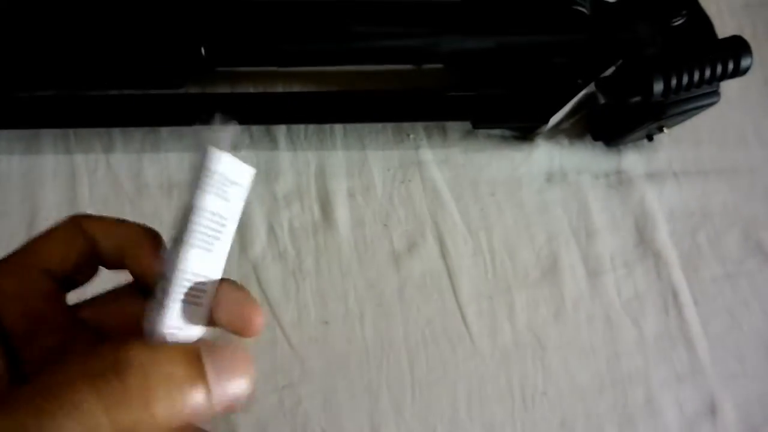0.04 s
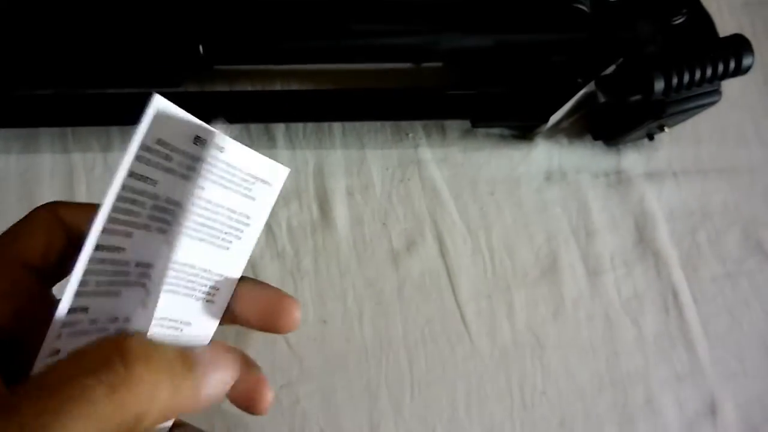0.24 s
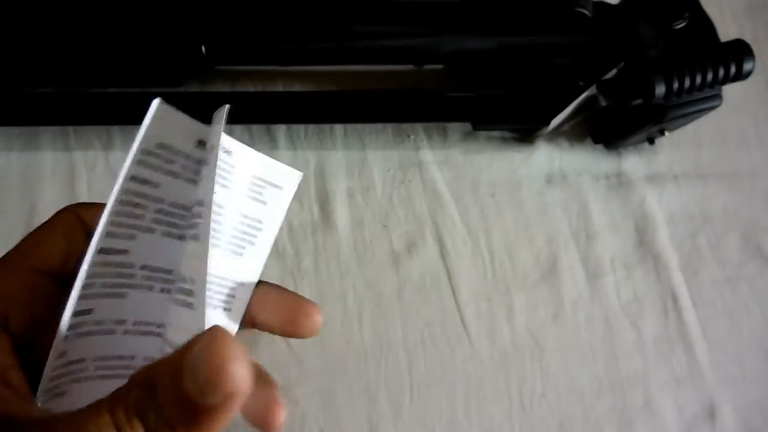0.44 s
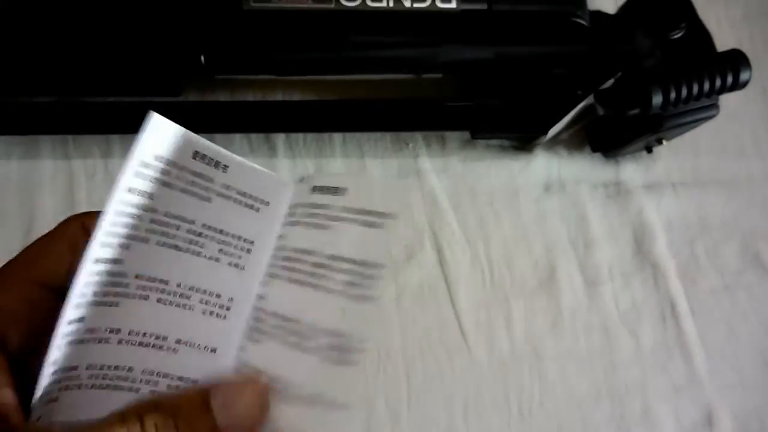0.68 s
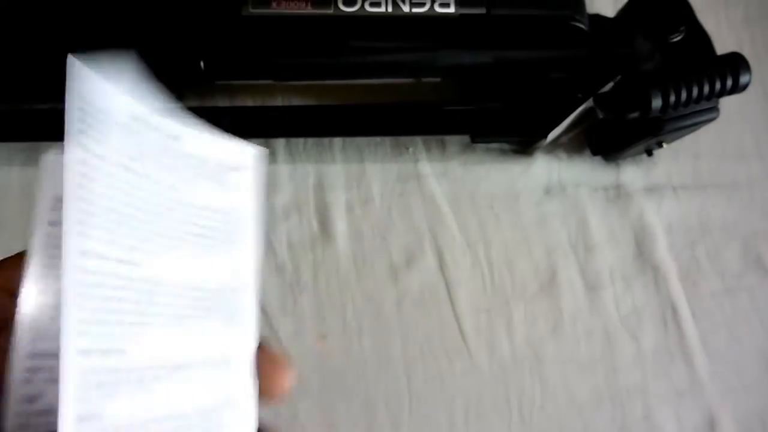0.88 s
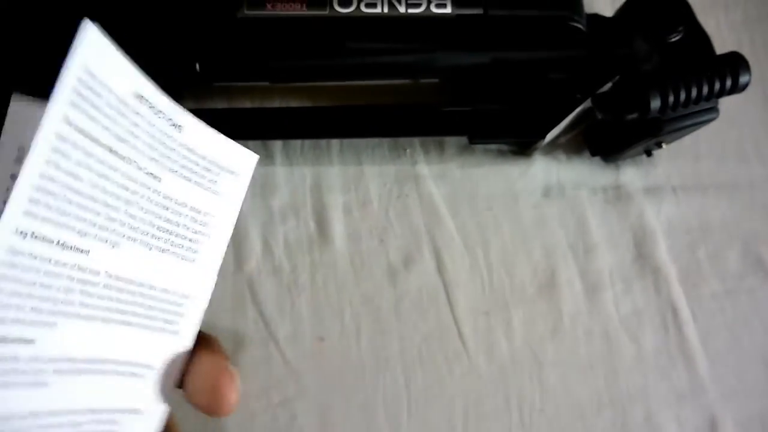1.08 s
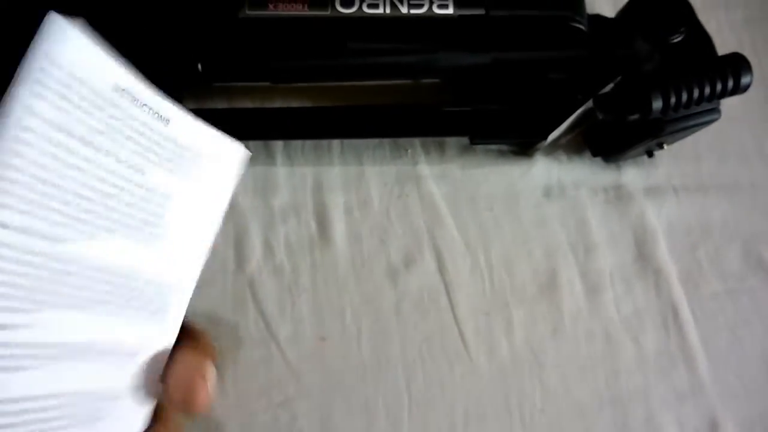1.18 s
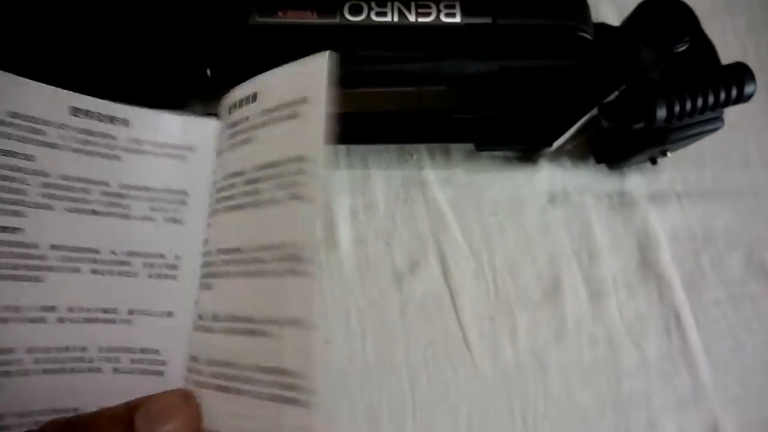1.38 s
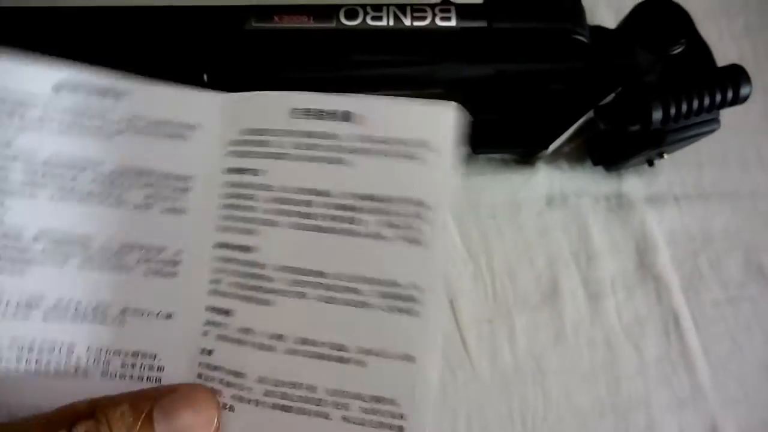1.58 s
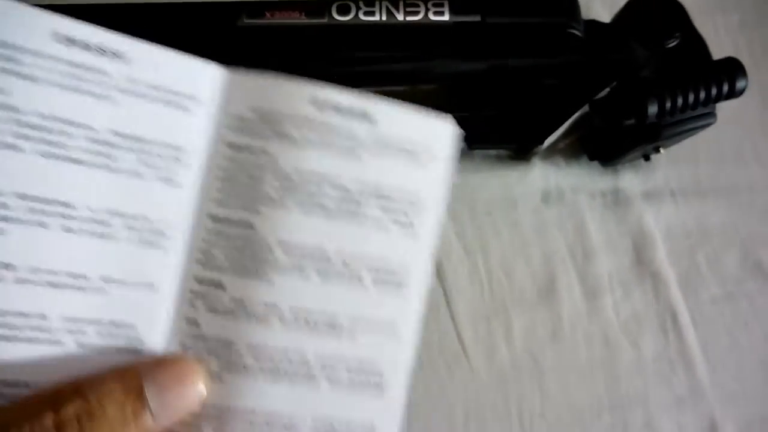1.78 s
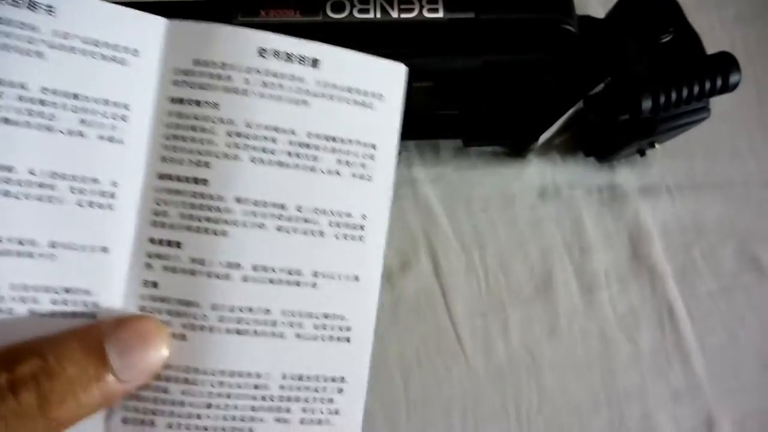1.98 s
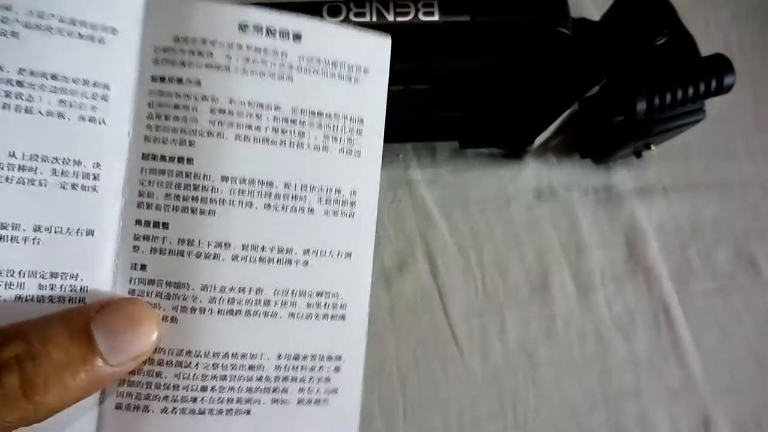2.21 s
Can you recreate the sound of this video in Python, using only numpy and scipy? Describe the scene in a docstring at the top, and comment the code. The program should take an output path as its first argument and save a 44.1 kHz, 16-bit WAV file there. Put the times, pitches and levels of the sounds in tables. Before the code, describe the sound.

A paper leaflet is unfolded by hand close to the microphone. A soft slide and small ticks lead to irregular crackling flaps and pops, with pages rubbing in between, in a quiet room with faint hiss.

```python
"""A folded paper leaflet is opened by hand, close to a small stereo microphone in a quiet room.
First a page slides softly and creases tick; at 0.25 s a panel buckles and flips with a crackling flap.
More flaps follow, with pops as panels pull tight and soft thuds as the sheet bends, loudest near
1.3 and 1.6 s. In between, pages rub over each other and the fingers. A last small flap comes near 1.9 s.
All along, the room adds a short echo and a faint hiss."""
import sys
import numpy as np
from scipy import signal
from scipy.fft import rfft, irfft
from scipy.io import wavfile
from scipy.ndimage import uniform_filter1d

SR = 44100
rng = np.random.default_rng(int(sys.argv[2]) if len(sys.argv) > 2 else 0)


def materialize(psi):
    """Save the field psi as 16-bit PCM at rate SR to the path in sys.argv[1].

    A 1-D psi becomes a single channel; in a 2-D psi each row is a channel.
    """
    bounded = np.clip(np.atleast_2d(psi).T, -1, 1)
    quanta = np.round(bounded * 32767).astype(np.int16)
    wavfile.write(sys.argv[1], SR, quanta)


N = 99225
T = np.arange(N) / SR
FFT_SIZE = 2 ** 17
FREQS = np.maximum(np.arange(FFT_SIZE // 2 + 1) * SR / FFT_SIZE, 1)


def flaps(count=8192):
    """A panel buckles: a rush of tiny fibre slips swells up to the flip and dies away."""
    # One flip a row: peak_s, level_db, rise_s, decay_s, resonance_hz, resonance_db, bass_db, treble_db
    flips = [(0.2439, -31, 0.0025, 0.00055, 2100, 8, 5, 15),
             (0.2551, -24.5, 0.0032, 0.0014, 3140, 3, 7, -2),
             (0.557, -35.5, 0.0084, 0.0053, 1610, 7.5, 2, 5),
             (0.6184, -27, 0.00061, 0.003, 1730, 16.5, 23, 3.5),
             (0.643, -38, 0.0062, 0.0037, 1790, 15, -1, 2), (0.9246, -27, 0.0032, 0.0014, 2770, 3, 11, 0),
             (.947, -39.5, 0.0035, 0.0015, 1580, 13, 14, -16), (1.122, -38, 0.004, 0.01, 1570, 4, 3, -1.5),
             (1.182, -40, 0.023, 0.016, 1550, 15, 12, 5), (1.3048, -28, 0.0055, 0.0064, 900, 5, 1, -3.5),
             (1.3074, -21, 0.0037, 0.0031, 1880, 15, 8, -3),
             (1.4123, -30, 0.0004, 0.0025, 2620, 4, -9, -10),
             (1.4192, -27.5, 0.001, 0.0032, 2820, 15, -11, -7),
             (1.5895, -22, 0.005, 0.0034, 3540, 3.5, 0.5, -1),
             (1.941, -34.5, 0.0054, 0.0072, 870, 15.5, -5, 3.5)]
    out = np.zeros((2, N))
    t = (np.arange(count) - count // 2) / SR  # zero at the flip
    for peak_s, level_db, rise_s, decay_s, hz, resonance_db, bass_db, treble_db in flips:
        swell = np.exp(np.minimum(t / rise_s, -t / decay_s))
        slips = swell * fibre_slips(count, per_s=11000, spread_db=3.5)
        sound = signal.fftconvolve(slips, paper_tone(hz, resonance_db, bass_db, treble_db))
        add_in_stereo(out, peak_s + t[0], unit_energy(sound) * np.sqrt(np.sum(swell ** 2)) * undb(level_db))
    return out


def pops(count=2048):
    """A panel is pulled tight: it rings briefly, and its pitch follows the tension, mostly upward."""
    # One pull a row: start_s, peak_db, slack_hz, tight_hz, swell_s
    pulls = [(0.6186, -25, 1450, 1930, 0.00044), (.924, -35.5, 1836, 1770, 0.0038),
             (1.2756, -20.5, 1580, 1840, 0.0003), (1.302, -23, 609, 2210, 0.0027),
             (1.5919, -20.5, 1430, 1810, .0012)]
    out, t = np.zeros((2, N)), T[:count]
    for start_s, peak_db, slack_hz, tight_hz, swell_s in pulls:
        pitch_hz = slack_hz + (tight_hz - slack_hz) * np.minimum(t / (np.pi * swell_s), 1)
        swell = t / swell_s * np.exp(1 - t / swell_s)
        add_in_stereo(out, start_s, undb(peak_db) * swell * np.sin(2 * np.pi * np.cumsum(pitch_hz) / SR))
    return out


def creases(count=1024):
    """A crease gives way: one sharp click, then a brief shiver of the sheet."""
    # One snap a row: start_s, level_db, resonance_hz, treble_db
    snaps = [(0.1261, -39, 2520, 7), (.1445, -41.5, 2780, 9), (0.2506, -24, 2630, -2),
             (0.2553, -23, 6100, 12), (.351, -31, 3670, 5), (0.3984, -38, 3600, 6.5),
             (0.6513, -31, 1760, 4), (.8897, -35.5, 2930, -5), (0.9088, -38, 1310, -12),
             (0.9175, -33, 1880, -1), (1.0225, -34, 2650, -6), (1.0778, -35.5, 1880, -1),
             (1.158, -35, 1600, -8), (1.195, -35, 1600, -3), (1.2742, -36, 2420, 13),
             (1.637, -34, 1470, -5), (1.6973, -34.5, 2060, -18), (1.7624, -41.5, 1840, 5),
             (1.769, -37.5, 2140, -6), (1.7811, -36.5, 1540, -10), (1.84, -36.5, 2550, 4.5),
             (1.9372, -33, 1500, -8)]
    shiver_s, shiver_db = 0.0015, 3.5
    out = np.zeros((2, N))
    for start_s, level_db, hz, treble_db in snaps:
        push = unit_energy(rng.standard_normal(count) * np.exp(-T[:count] / shiver_s)) * undb(shiver_db)
        push[0] -= 1  # the click
        tone = paper_tone(hz, resonance_db=6.5, bass_db=10.5, treble_db=treble_db)
        gain = np.sqrt(0.0013 * SR) * undb(level_db)  # as much energy as 1.3 ms at this level
        add_in_stereo(out, start_s, unit_energy(signal.fftconvolve(push, tone)) * gain)
    return out


def thuds():
    """The whole sheet swings briefly when the fingers push it, with a soft, hollow thud."""
    # One push a row: start_s, level_db, pitch_hz, decay_s
    pushes = [(0.252, -28, 232, 0.0032), (.2535, -29.5, 640, 0.0072), (0.351, -37, 256, 0.0062),
              (0.35, -31, 590, 0.0028), (0.564, -54, 75, 0.012), (.6195, -27.5, 795, .003),
              (0.921, -53.5, 90.5, 0.012), (1.079, -40.5, 177, 0.0048), (1.169, -58.5, 83.5, 0.031),
              (1.305, -41, 81, 0.0047), (1.303, -30.5, 530, 0.0054)]
    out = np.zeros(N)
    for start_s, level_db, pitch_hz, decay_s in pushes:
        t = np.maximum(T - start_s, 0)
        swell = np.exp(-t / decay_s) * (1 - np.exp(-2 * pitch_hz * t))
        out += undb(level_db) * swell * np.sin(2 * np.pi * pitch_hz * t)
    return out


def slides(count=16384, piece=1024):
    """A page rubs in small jerks: dense slips fade in and out, from a spot that keeps moving."""
    # One stroke a row: start_s, end_s, start_db, end_db, resonance_hz, treble_db
    strokes = [(0, 0.083, -56, -51.5, 4900, 8.5), (0.32, 0.44, -56.5, -57, 3650, 3.5),
               (0.464, 0.62, -58.5, -52.5, 2010, 2), (0.648, 0.737, -53, -47, 1680, 4.5),
               (0.763, 0.936, -47, -42.5, 1600, 2.5), (0.928, 0.972, -48, -43, 3630, 1),
               (0.998, 1.205, -48, -50.5, 2550, 2.5), (1.182, 1.32, -57, -47, 1680, 3.5),
               (1.331, 1.394, -49, -55.5, 1640, -2), (1.41, 1.587, -49, -45.5, 2870, -1),
               (1.591, 1.711, -52.5, -46, 1830, -2), (1.647, 1.707, -54, -49.5, 11600, 39),
               (1.764, 1.92, -53.5, -52.5, 1450, -1.5)]
    fade_s, jerk_db = 0.016, 1.9
    out = np.zeros((2, N))
    for start_s, end_s, start_db, end_db, hz, treble_db in strokes:
        t = max((start_s + end_s - count / SR) / 2, 0) + T[:count]
        fade_in = .5 * (1 + np.tanh((t - start_s) / fade_s))
        fade_out = .5 * (1 + np.tanh((end_s - t) / fade_s))
        jerks = unit_rms(uniform_filter1d(rng.standard_normal(count), size=300))
        level_db = np.interp(t, [start_s, end_s], [start_db, end_db]) + jerk_db * jerks
        slips = fibre_slips(count, per_s=6000, spread_db=2.5)
        tone = paper_tone(hz, resonance_db=3.5, bass_db=0, treble_db=treble_db)
        rub = unit_rms(signal.fftconvolve(slips, tone)[:count]) * fade_in * fade_out * undb(level_db)
        for i in range(0, count - piece, piece // 2):  # each new spot scatters in its own way
            add_in_stereo(out, (int(t[0] * SR) + i + .5) / SR, rub[i:i + piece] * np.hanning(piece))
    return out


def fibre_slips(count, per_s, spread_db):
    """Paper fibres slip at random moments, a few much harder than the rest."""
    slipping = rng.random(count) < per_s / SR
    strength = np.minimum(rng.exponential(size=count), 2 * np.e)
    return rng.choice([-1, 1], count) * slipping * undb(spread_db * strength)


def paper_tone(hz, resonance_db, bass_db, treble_db, size=2048):
    """How a panel answers one tap: the paper's own tone, a broad resonance at hz, bass and treble."""
    # How strongly the paper sounds, from low to high: frequency_hz, level_db
    paper = [(30, -19.5), (120, -22), (230, -18.5), (380, -11.5), (600, -1), (1100, -2), (1700, 2.5),
             (3400, -0.5), (6000, -8), (13500, -15.5), (15500, -33)]
    width_octaves, bass_hz, treble_hz = 0.3, 313, 4140
    f = np.maximum(np.arange(size // 2 + 1) * SR / size, 1)
    db = curve(paper, f) + resonance_db * np.exp(-.5 * (np.log2(f / hz) / width_octaves) ** 2)
    db += bass_db * np.exp(-np.log2(f / bass_hz) ** 2)
    db += treble_db / (1 + (treble_hz / f) ** 6)
    # Turn these levels into a short ring that never comes before the tap.
    cepstrum = irfft(db * np.log(10) / 20)
    cepstrum[1:size // 2] *= 2
    cepstrum[size // 2 + 1:] = 0
    return irfft(np.exp(rfft(cepstrum)))


def add_in_stereo(track, start_s, sound, padding=512):
    """Mix a sound in: it reaches the left side a little sooner; hand and paper scatter its treble."""
    right_delay_s, scatter_s, scatter_db, scatter_hz = 0.000034, 0.0012, -3, 2900
    sound = np.pad(sound, padding)  # silence on both ends for the scatter to spread into
    n = len(sound)
    f = np.arange(n // 2 + 1) * SR / n
    direct = np.exp(-2j * np.pi * f * np.array([[0], [right_delay_s]]))
    scatter = rfft(rng.standard_normal((2, n)) * np.exp(-T[:n] / scatter_s))
    scatter = undb(scatter_db) * scatter / np.abs(scatter) * f / (f - 1j * scatter_hz)
    heard = irfft(rfft(sound) * (direct + scatter), n)
    i = int(start_s * SR) - padding
    heard, i = heard[:, max(-i, 0):], max(i, 0)
    track[:, i:i + heard.shape[1]] += heard[:, :max(N - i, 0)]


def room():
    """The room's echo as a gain per frequency: near reflections, a short tail and two low notes."""
    # The tail, band by band: frequency_hz, fade_s (time to drop 60 dB), level_db
    bands = [(204, 0.13, -7), (590, 0.14, -4), (1540, 0.13, -8.5), (3700, 0.11, -9.5), (9350, 0.083, -11.5)]
    # Notes the room rings at: pitch_hz, fade_s, level_db
    notes = [(237, 0.71, -84), (636, 0.15, -89)]
    early_s, early_db, build_s = 0.0041, -12, 0.0027

    def noise():
        """Noise whose bass is the same on both sides and whose treble is only partly so."""
        shared = rng.standard_normal(N)
        return unit_rms(shared + shape(rng.standard_normal((2, N)), FREQS / np.hypot(FREQS, 1500)))

    early = unit_energy(noise() * T * np.exp(-2 * T / early_s))
    echo = undb(early_db) * shape(early, FREQS / np.hypot(FREQS, 1400))  # weaker below 1400 Hz
    tail = noise()
    for hz, fade_s, level_db in bands:
        band = curve([(row[0], row[0] == hz) for row in bands], FREQS)
        swell = unit_energy((1 - np.exp(-T / build_s)) * undb(-60 * T / fade_s))
        echo += undb(level_db) * shape(tail, band) * swell
    for hz, fade_s, level_db in notes:
        echo += undb(level_db - 60 * T / fade_s) * np.sin(2 * np.pi * hz * T)
    return rfft(echo, FFT_SIZE)


def hiss(level_db=-58):
    """A faint, steady background, partly shared by both sides."""
    # The tone of the hiss: frequency_hz, relative_db
    tone = [(30, -11.5), (130, -6.5), (500, 0.5), (1200, 1), (2500, -3), (5000, -11), (11000, -20),
            (15500, -29)]
    noise = rng.standard_normal(N) + 3.24 * rng.standard_normal((2, N))
    return unit_rms(shape(noise, undb(curve(tone, FREQS)))) * undb(level_db)


def undb(db):
    """Turn decibels into a gain to multiply by."""
    return 10 ** (np.asarray(db) / 20)


def unit_rms(x):
    """Scale to an average power of 1."""
    return x / np.sqrt(np.mean(x ** 2))


def unit_energy(x):
    """Scale so that the squared samples add up to 1."""
    return x / np.sqrt(np.sum(x ** 2, axis=-1, keepdims=True) + 1e-18)


def curve(points, f):
    """Join (frequency_hz, value) points with lines, octaves evenly spaced, and read them at f."""
    hz, values = np.array(points, float).T
    return np.interp(np.log(f), np.log(hz), values)


def shape(x, gain):
    """Filter a whole track by a gain per frequency."""
    return irfft(rfft(x, FFT_SIZE) * gain)[..., :N]


def scene():
    """The leaflet, a little to the left, in the room."""
    # How much louder the left side is: frequency_hz, left_minus_right_db
    lean = [(100, 2), (1000, 2), (2200, 0), (5000, -1), (9000, 2.5), (14000, 1)]
    balance = undb(np.array([[.5], [-.5]]) * curve(lean, FREQS))
    leaflet = flaps() + creases() + pops() + slides() + thuds()
    return shape(leaflet, (1 + room()) * balance) + hiss()


def record(dry):
    """The recorder cuts the highest treble, above 15700 Hz."""
    return signal.sosfilt(signal.ellip(10, .2, 80, 15700, fs=SR, output="sos"), dry)


dry = scene()
out = record(dry)
materialize(out)
```